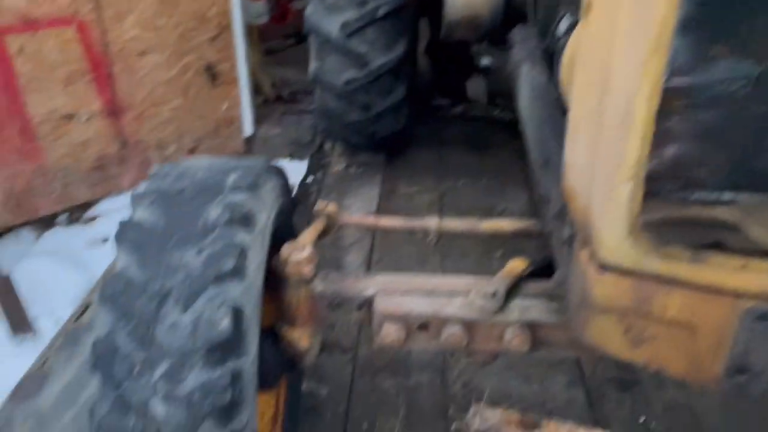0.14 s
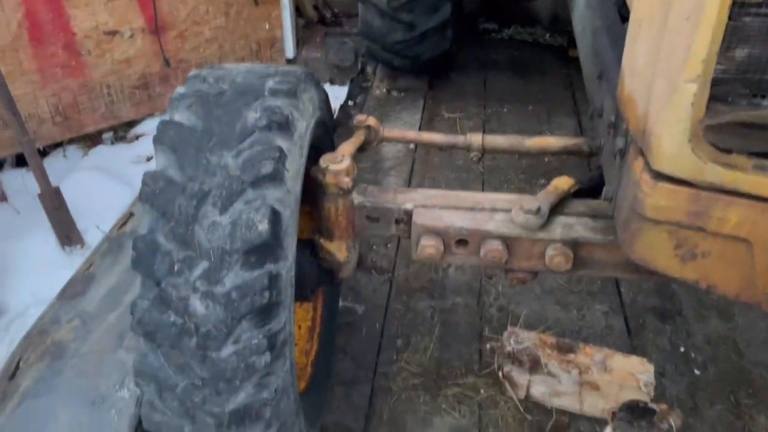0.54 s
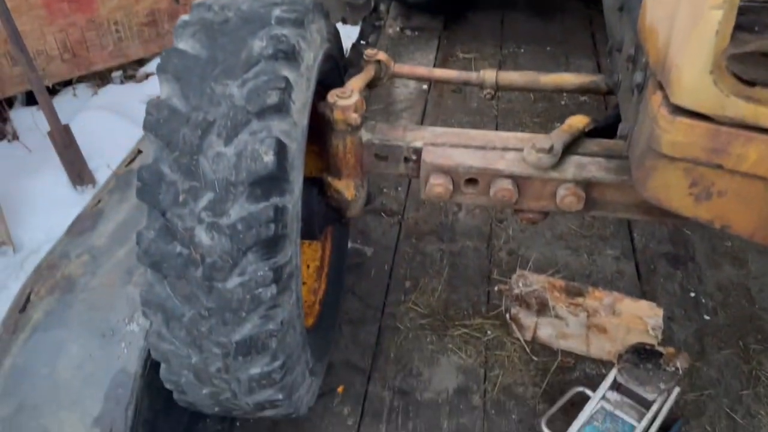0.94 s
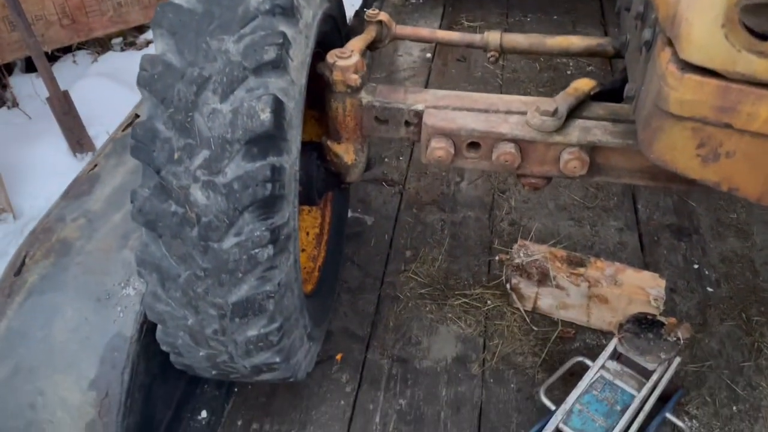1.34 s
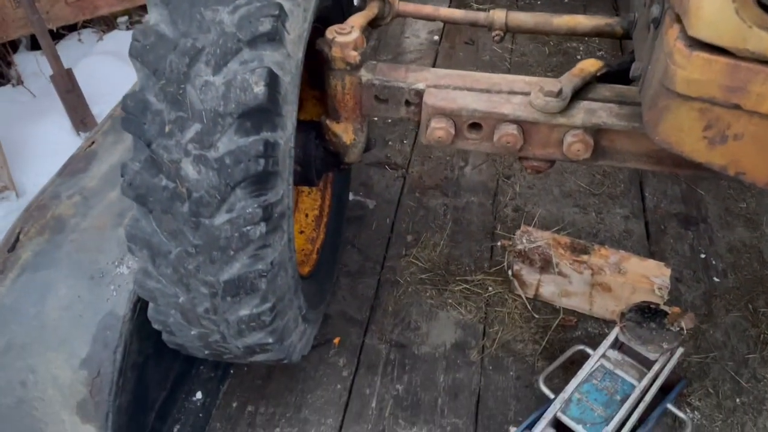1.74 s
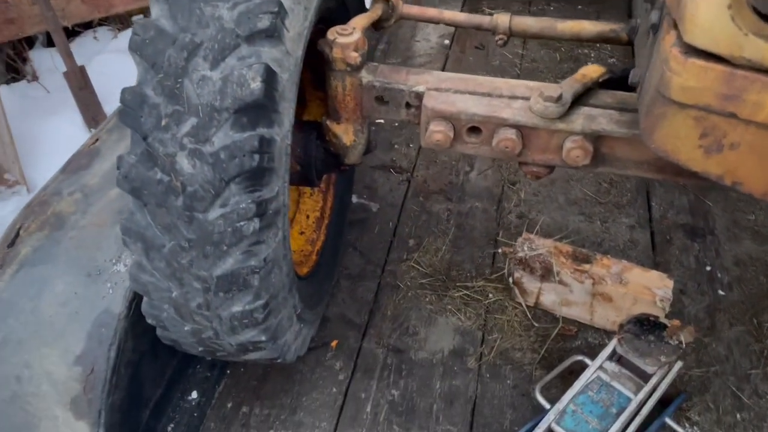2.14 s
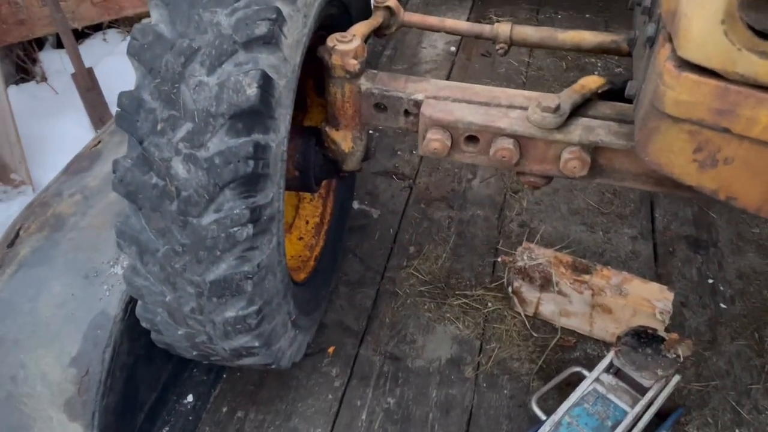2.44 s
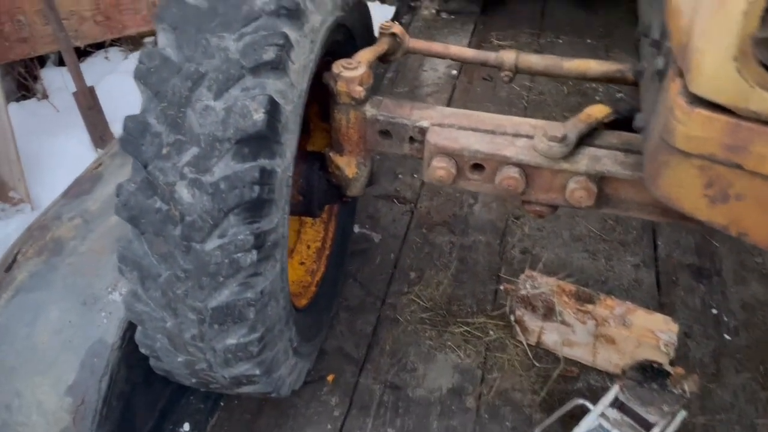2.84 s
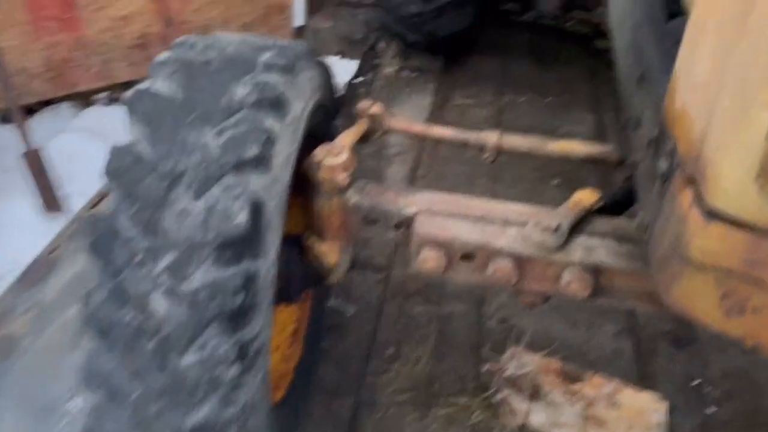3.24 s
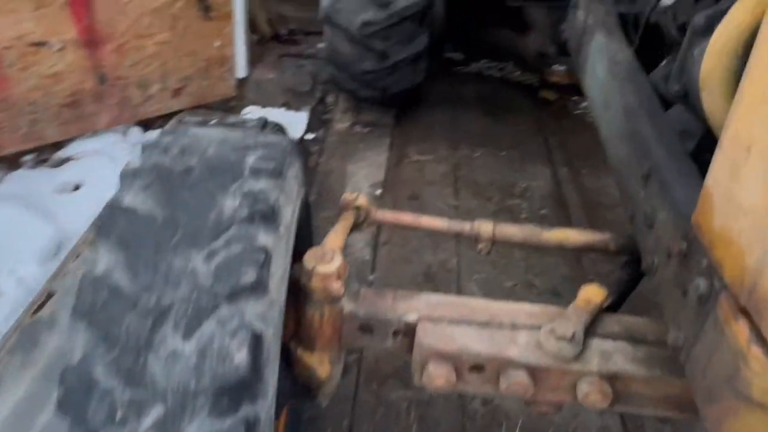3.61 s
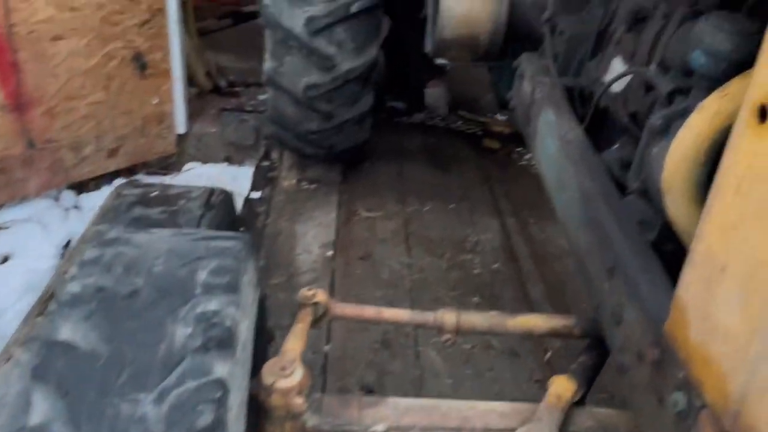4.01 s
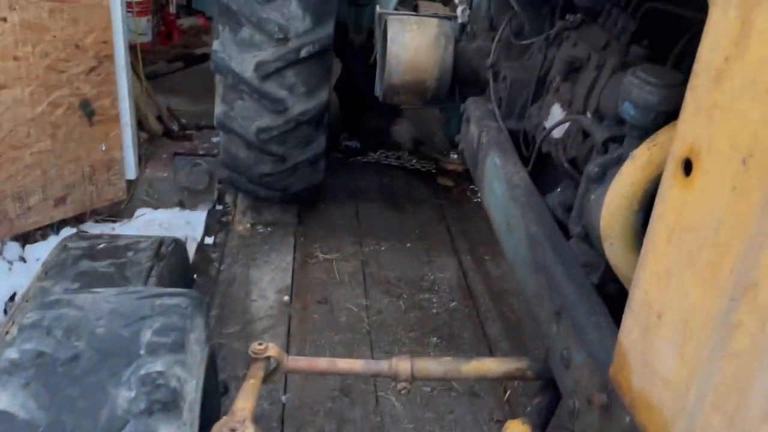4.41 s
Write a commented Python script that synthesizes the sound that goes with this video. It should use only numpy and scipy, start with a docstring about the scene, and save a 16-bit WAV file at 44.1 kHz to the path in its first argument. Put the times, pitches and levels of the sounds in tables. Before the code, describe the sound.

Wind thumps the microphone, then a steel pawl clicks in quick bursts, clanking on returns and ticking on pulls inside a farm building.

```python
"""A hand-held two-port microphone beside a loaded chain hoist and a silent tractor in a farm building.
Wind opens with heavy thumps, then stays as lighter rumble and buffets; faint still air lies underneath.
From 0.1 s the hoist is worked to and fro, a return first: the pawl clanks over three or four teeth on returns
and ticks brightly over five or six on pulls. Each drop is a burst of shaped noise plus ringing housing modes.
The chain clinks softly as the stroke turns, with one dull knock at 4.02 s, and jostles during pulls."""
import sys
import numpy as np
from scipy import signal
from scipy.fft import rfft, irfft, next_fast_len
from scipy.io import wavfile

SR = 44100
rng = np.random.default_rng(int(sys.argv[2]) if len(sys.argv) > 2 else 0)


def put_to_file(sound):
    """Save the sound as 16-bit audio at rate SR, in the file named by the first command-line argument."""
    columns = np.atleast_2d(sound).T  # one column per channel
    safe = np.clip(columns, -1, 1)
    whole_steps = np.round(safe * 32767)
    wavfile.write(sys.argv[1], SR, whole_steps.astype(np.int16))


N = 201316

# Wind on the microphone. Each row: time in [s], relative deep rumble in [dB], relative flutter in [dB].
WIND_LEVELS = [(0.0, -35.5, -18.5), (0.06, -15, -21), (0.1, -25, -23), (0.39, -29.5, -32), (0.41, -34, -32),
               (0.51, -22, -29), (0.63, -48.5, -65), (0.74, -28, -44), (1.05, -52.5, -55.5),
               (1.14, -31.5, -42.5), (1.18, -44, -52.5), (1.71, -55, -42.5), (1.78, -60, -66),
               (1.89, -34, -43.5), (2.03, -45.5, -39), (2.11, -34.5, -42.5), (2.17, -43, -53),
               (2.26, -33.5, -37), (2.41, -35.5, -42.5), (2.45, -30.5, -38.5), (2.54, -40.5, -48),
               (2.83, -37, -43), (4.28, -42.5, -44.5), (4.33, -36, -42), (4.52, -45, -55), (4.56, -23, -27)]
# Spectrum of the wind eddies. Each row: frequency in [Hz], relative density in [dB per Hz].
WIND_SPECTRUM = [(13, -38), (22, -49), (43, -6.5), (65, -1), (200, -7.5), (227, -8), (294, -7),
                 (371, -10.5), (411, -21), (480, -13), (620, -60), (1060, -120)]
# Thumps on the microphone, and at 4.02 s the dull knock of a seating link.
# Each row: start in [s], relative level in [dB], pitch in [Hz].
THUMPS = [(.011, -12.5, 326), (0.027, -12.5, 474), (0.04, -14, 604), (.047, -16.5, 61), (0.067, -14, 370),
          (0.094, -17, 363), (.177, -12.5, 360), (0.452, -15.5, 670), (.492, -19.5, 315), (.754, -25, 324),
          (2.096, -25.5, 293), (2.442, -24.5, 199), (2.487, -27.5, 285), (2.961, -25, 198),
          (3.815, -28.5, 170), (4.02, -30.5, 500), (4.325, -25.5, 91), (4.546, -23.5, 231)]
# Still air of the building. Each row: frequency in [Hz], relative density in [dB per Hz].
AIR_SPECTRUM = [(30, -4.5), (60, 2.5), (120, -15), (300, -22), (700, -22.5), (2000, -17.5), (5000, -23),
                (9000, -34), (15000, -41)]
# The two microphone ports. Each row: frequency in [Hz], left over right in [dB], likeness [0-1],
# phase by which left leads in [rad].
MIC_PORTS = [(400, 2, .7, 0), (1200, 1.5, .69, -.1), (1900, 3.2, .45, -.4), (2600, 6, .75, .6),
             (3400, 3.1, .44, -.6), (5100, 1.8, .47, .4), (6600, 2.3, .8, -1.2), (8200, 0, .98, -3.2),
             (10200, 0, .85, -5.2), (11500, 0, .98, -6.3), (13000, 0, .82, -7.6), (14800, 0, .98, -9.4)]
# Spectrum of the struck steel. Each row: frequency in [Hz], relative density in [dB per Hz].
STEEL_SPECTRUM = [(250, -14), (600, -9), (850, -13), (1050, -10.5), (1200, -12.5), (1650, -5), (2100, -3.5),
                  (2800, -4), (4300, -6.5), (5400, -1), (7200, 0.5), (8800, 2), (10600, -3), (12000, -4),
                  (15600, -6.5)]
# How the steel ring dies. Each row: frequency in [Hz], 60 dB decay in [s] before scaling for pawl or chain.
STEEL_DECAY = [(500, 0.089), (1200, 0.1), (2500, 0.12), (5500, 0.13), (11000, 0.066)]
# The heavy parts swell after the tick. Each row: frequency in [Hz], build-up in [s].
STEEL_BUILD_UP = [(500, 0.0092), (2300, 0.0034), (5000, 0.0022), (11000, 0.0008)]
# A harder drop of the pawl favours the middle modes. Each row: frequency in [Hz],
# extra level in [dB per dB of force], weighted anew for each kind of blow.
FORCE_COLOUR = [(1000, -0.87), (1600, 0), (2600, 0.2), (3800, 1.7), (5300, -0.56), (12000, -0.5)]
# Modes of the hoist housing. Each row: frequency in [Hz], relative level in [dB], 60 dB decay in [s].
HOUSING_MODES = [(1051, -16, 0.15), (1455, -11, 0.12), (1621, -9, 0.15), (2080, -10, 0.18),
                 (2455, -18.5, 0.3), (2550, -21, 0.23), (2844, -9.5, 0.13), (3370, -11, 0.076),
                 (3876, -14, 0.077), (5280, -15.5, 0.2), (7100, -1.5, 0.02), (9470, -11.5, 0.045),
                 (11360, -11, 0.11), (11800, -20.5, 0.1)]
# Returns of the handle. Each row: first click in [s], last click in [s], teeth [count],
# lag at mid-stroke [share of the stroke], relative ring in [dB], relative tick in [dB],
# growth of the ring over the stroke in [dB], centre of the strongest ring's pitch in [Hz].
RETURN_STROKES = [(0.1136, 0.3006, 4, -.128, -22.5, -30, -0.5, 2955),
                  (0.8707, 0.9926, 3, -0.009, -24, -29, -2, 1700),
                  (1.593, 1.6955, 3, -.025, -23, -28, 0.5, 2604),
                  (2.2948, 2.383, 3, 0.022, -21.5, -28.5, 2, 2163),
                  (3.0127, 3.101, 3, .003, -22.5, -27.5, 4, 2120),
                  (3.721, 3.8126, 3, -0.011, -20, -25, 4.5, 2884),
                  (4.426, 4.5228, 3, 0.058, -18, -25, 5.5, 2624)]
# Chain links seating as the stroke turns. Each row: time in [s], relative ring in [dB].
SEATING_LINKS = [(0.376, -24.5), (0.7658, -22.5), (0.808, -29.5), (1.1584, -22), (1.4918, -24.5),
                 (1.5235, -30), (1.8542, -22), (2.182, -34.5), (2.575, -20), (2.9185, -28.5), (2.95, -33),
                 (3.2466, -30.5), (3.275, -28.5), (3.3093, -16), (3.613, -28.5), (3.64, -27), (3.9618, -25),
                 (4.0173, -12), (4.3206, -30), (4.3594, -32.5)]
# Pulls of the handle. Each row: first click in [s], last click in [s], teeth [count],
# lag at mid-stroke [share of the stroke], slowing at both ends [share], relative ring in [dB].
PULL_STROKES = [(0.4483, 0.623, 6, -.008, 0.058, -26.5), (1.2272, 1.3693, 5, -0.042, 0.046, -26.5),
                (1.9203, 2.0613, 5, -0.018, 0.03, -26.5), (2.6337, 2.7788, 5, -0.016, 0.042, -27),
                (3.3593, 3.5015, 5, .012, 0.0102, -23), (4.0674, 4.2363, 5, -0.075, 0.052, -22.5)]

TIME = np.arange(N) / SR
SIZE = next_fast_len(N)
FREQS = np.maximum(np.fft.rfftfreq(SIZE, 1 / SR), 1)

AIR_DB = -50
CUTOFF_HZ = 15900
RETURN_SLOWING, RETURN_CRACK_OVER_TICK_DB = 0.066, 1
# Pawl levels here are relative: strikes() adds its own offsets.
PULL_TICK_DB, PULL_CRACK_OVER_RING_DB, PULL_RING_HZ = -25.5, 10, 2110
PULL_TICK_GROWTH = 0.24  # extra dB of tick per dB that a pull rings above the softest one
TOOTH_SPREAD_DB = 0.6  # no two teeth of a pull tick quite alike
CHATTER_S = 0.0039  # how long the pawl bounces
RING_SCATTER = 0.011  # spread of the strongest ring's pitch, as a share
LINK_TICK_DB, LINK_CHATTER_S = -16, 0.0055  # tick relative to the ring; how long a link rattles
# The chain runs a little longer than a pull's clicks, and softer than the pull by RUN_DB.
RUN_LEAD_S, RUN_TAIL_S, RUN_DB, RUN_SPREAD_DB = 0.037, 0.012, -15, 3.5


def from_db(db):
    """Decibels to gain."""
    return 10 ** (np.asarray(db) / 20)


def at_hz(points, hz, axis=1):
    """One column of a table, read on a log-frequency axis."""
    points = np.array(points)
    return np.interp(np.log(hz), np.log(points[:, 0]), points[:, axis])


def rms_one(x):
    """Scale to unit level."""
    return x / np.sqrt(np.mean(x ** 2) + 1e-20)


def butter(x, hz, kind, order=2):
    """Causal low- or high-pass."""
    return signal.sosfilt(signal.butter(order, hz, kind, fs=SR, output="sos"), x)


def to_wave(spectrum):
    """Stereo spectrum to a wave of the scene's length."""
    return irfft(spectrum, SIZE)[:, :N]


def port_noise(level_db):
    """Spectrum of a unit-level noise as the two ports hear it: partly alike, right leading in the high treble."""
    first, second = rfft(rng.standard_normal((2, SIZE)))
    tilt_db, alike, phase = (at_hz(MIC_PORTS, FREQS, axis=k) for k in range(1, 4))
    alike = np.clip(alike, 0, 1)
    right = alike * first + np.sqrt(1 - alike ** 2) * second
    right = right * np.exp(-1j * phase)
    gains = rms_one(from_db(level_db + np.array([tilt_db, -tilt_db]) / 2))
    return gains * np.array([first, right])


def place(seconds, weights):
    """Impulses of the given weights at the given times."""
    at = np.clip(seconds * SR, 0, N - 1).astype(int)
    return np.bincount(at.ravel(), weights.ravel(), N)


def ring(clicks, hz, t60):
    """A unit click sets a decaying sine of starting height 1 ringing."""
    radius = from_db(-60 / (t60 * SR))
    angle = 2 * np.pi * hz / SR
    return signal.lfilter([0, np.sin(angle)], [1, -2 * radius * np.cos(angle), radius ** 2], clicks + 1e-18)


def fade(power, t60):
    """Energy put in dies away by 60 dB in t60."""
    return signal.lfilter([1], [1, -from_db(-60 / (t60 * SR)) ** 2], power + 1e-18)


def swell(power, seconds):
    """Energy takes a moment to spread through the metal."""
    keep = np.exp(-1 / (seconds * SR))
    return signal.lfilter([1 - keep], [1, -keep], power)


def wind(rumble_db, flutter_db, rush_db, side_db, flutter_hz, rush_hz, rush_growth, lumps_db, lumps_hz):
    """Eddies rumble in lumps on both ports nearly alike; the middle range grows faster with the gusts."""
    s, deep, flutter = np.transpose(WIND_LEVELS)
    deep, flutter = np.interp(TIME, s, deep), np.interp(TIME, s, flutter)
    noise = rfft(rng.standard_normal((2, SIZE)))
    mid, side = to_wave(noise * from_db(at_hz(WIND_SPECTRUM, FREQS)))
    lumps = from_db(lumps_db * rms_one(butter(rng.standard_normal(N), lumps_hz, "low")))
    eddies = (mid + from_db(side_db) * side * [[1], [-1]]) * lumps
    low = rms_one(butter(eddies, 156, "low", order=4))
    high = butter(eddies, 176, "high", order=4)
    high = rms_one(butter(high, flutter_hz, "low", order=4))
    rush = to_wave(port_noise(np.zeros(len(FREQS)))) * lumps
    rush = butter(rush, 325, "high")
    rush = rms_one(butter(rush, rush_hz, "low", order=5))
    gust = flutter + rush_growth * (flutter - flutter.max())
    return low * from_db(deep + rumble_db) + high * from_db(flutter + flutter_db) + rush * from_db(gust + rush_db)


def still_air():
    """The building's air is a faint steady noise, shaped by its spectrum."""
    return from_db(AIR_DB) * to_wave(port_noise(at_hz(AIR_SPECTRUM, FREQS)))


def thumps(level_db, cycles):
    """Each thump, and the one link knock, is a dull swing that dies in a few cycles, alike on both ports."""
    out = np.zeros(N)
    for s, db, hz in THUMPS:
        out = out + ring(place(np.array([s]), from_db([db])), hz, cycles / hz)
    return from_db(level_db) * butter(out, 1670, "low", order=4)


def tooth_times(first, last, teeth, lag, slowing):
    """The teeth pass evenly but for the hand, slow at both ends of a stroke and early or late between."""
    way = np.linspace(0, 1, int(round(teeth)))
    return first + (last - first) * (way + lag * np.sin(np.pi * way) + slowing * np.sin(2 * np.pi * way))


def pawl_drops():
    """One drop per tooth: (s, crack dB, ring dB, tick dB, chatter s, strongest ring Hz), levels relative."""
    drops = []
    for first, last, teeth, lag, ring_db, tick_db, growth_db, hz in RETURN_STROKES:
        crack_db = tick_db + RETURN_CRACK_OVER_TICK_DB
        for s in tooth_times(first, last, teeth, lag, RETURN_SLOWING):
            grown_db = growth_db * ((s - first) / (last - first) - 0.5)
            drops.append((s, crack_db, ring_db + grown_db, tick_db, CHATTER_S, hz))
    softest_db = min(row[-1] for row in PULL_STROKES)
    for first, last, teeth, lag, slowing, ring_db in PULL_STROKES:
        crack_db = ring_db + PULL_CRACK_OVER_RING_DB
        stroke_tick_db = PULL_TICK_DB + PULL_TICK_GROWTH * (ring_db - softest_db)
        for s in tooth_times(first, last, teeth, lag, slowing):
            tick_db = stroke_tick_db + TOOTH_SPREAD_DB * rng.standard_normal()
            drops.append((s, crack_db, ring_db, tick_db, CHATTER_S, PULL_RING_HZ))
    return np.array(drops)


def steel_bands(ripple_db, count=26):
    """The close modes of hoist and chain, as noise with narrow ripples split in bands: [(Hz, stereo wave)]."""
    knots = np.arange(0, SR / 2, 90)
    ripple = np.interp(FREQS, knots, rng.standard_normal(len(knots)))
    ripple = ripple_db * ripple * at_hz([(1500, 0.18), (5000, 0.052)], FREQS)  # smoother in the treble
    modes = port_noise(at_hz(STEEL_SPECTRUM, FREQS) + ripple)
    centres = np.geomspace(350, 15000, count)
    position = np.interp(np.log(FREQS), np.log(centres), np.arange(count))
    position = position - np.maximum(np.log2(centres[0] / FREQS), 0)  # lowest band fades out over an octave
    bands = []
    for k, hz in enumerate(centres):
        share = np.cos(np.pi / 2 * np.clip(position - k, -1, 1))
        bands.append((hz, to_wave(modes * share)))
    return bands


def strikes(table, bands, ring_db, tick_db, favour, colour_db, ring_length, room_db, room_t60, count=6):
    """Each blow is a chatter of contacts: any crack, a short ring coloured anew each time, the room's tail."""
    s, peak, ring_level, tick_level, chatter = np.transpose(table)[:5]
    steps = np.arange(count) + rng.random((len(s), count))
    contacts = s[:, None] + chatter[:, None] * (steps - steps[:, :1]) / count
    shares = rng.exponential(1, (len(s), count)) * np.exp(-np.arange(count) / 5)  # later contacts tend softer
    shares /= shares.sum(axis=1, keepdims=True)
    colours = colour_db * rng.standard_normal((len(s), len(bands)))
    force_db = ring_level - ring_level.mean()
    out = np.zeros((2, N))
    for (hz, wave), colour in zip(bands, colours.T):
        treble = at_hz([(2900, 0.022), (5500, 1)], hz)  # share governed by the tick rather than the ring
        favoured = favour * at_hz(FORCE_COLOUR, hz) * force_db
        body_level = ring_level + ring_db + favoured
        level = (1 - treble) * body_level + treble * (tick_level + tick_db) + colour
        energy = swell(place(contacts, shares * from_db(level)[:, None] ** 2), at_hz(STEEL_BUILD_UP, hz))
        crack = treble * place(contacts, shares * from_db(peak + colour)[:, None] ** 2)
        power = fade(energy, ring_length * at_hz(STEEL_DECAY, hz)) + fade(crack, 0.015)
        scattered = swell(energy, 0.0057)  # the walls answer a little later, and keep the lows longer
        room = from_db(room_db) ** 2 * fade(scattered, room_t60 * (hz / 3000) ** -0.13)
        out += wave * np.sqrt(power + room)
    return out


def housing(drops, level_db, vary_db, strongest_db, strongest_t60, hardness, left_db):
    """Every pawl drop rings the housing's modes anew; one stands out, the more so the harder the drop."""
    s, _, ring_level, _, _, strongest = drops.T
    strongest = strongest * (1 + RING_SCATTER * rng.standard_normal(len(s)))
    strengths = vary_db * rng.standard_normal((len(s), len(HOUSING_MODES)))
    force_db = ring_level - ring_level.mean()
    out = np.zeros(N)
    for (hz, db, t60), extra in zip(HOUSING_MODES, strengths.T):
        height_db = ring_level + level_db + db + extra + at_hz(FORCE_COLOUR, hz) * force_db
        out = out + ring(place(s + 0.002, from_db(height_db)), hz, t60)  # 2 ms after the drop
    age = TIME[:SR // 4]
    envelope = from_db(-60 * age / strongest_t60) * (1 - np.exp(-age / 0.003))
    pings = np.sin(2 * np.pi * strongest[:, None] * age) * envelope
    heights = from_db(ring_level + strongest_db + hardness * force_db)
    at = (s[:, None] * SR).astype(int) + np.arange(len(age))
    out = out + np.bincount(at.ravel(), (heights[:, None] * pings).ravel(), N)[:N]
    return out * from_db(np.array([[left_db], [-left_db]]) / 2)


def running_links(count=6):
    """While a pull hauls the chain, links jostle at random: (s, relative ring dB)."""
    links = []
    for first, last, *_, pull_db in PULL_STROKES:
        for _ in range(count):
            s = rng.uniform(first - RUN_LEAD_S, last + RUN_TAIL_S)
            links.append((s, pull_db + RUN_DB + RUN_SPREAD_DB * rng.standard_normal()))
    return links


def chain(bands, lead_s, lead_db):
    """A link grazes its neighbour, then drops into its pocket without a crack; softer ones jostle during pulls."""
    grazes = [(s - lead_s, db + lead_db) for s, db in SEATING_LINKS]
    links = list(SEATING_LINKS) + grazes + running_links()
    blows = [(s, -np.inf, db, db + LINK_TICK_DB, LINK_CHATTER_S) for s, db in links]  # -inf: no crack
    return strikes(blows, bands, ring_db=4.0, tick_db=3.0, favour=-0.2, colour_db=1.5,
                   ring_length=0.6, room_db=-18, room_t60=0.25)


def scene():
    """Wind, still air, thumps, hoist and chain."""
    gusts = wind(rumble_db=-1.0, flutter_db=-2.0, rush_db=-3, side_db=-9.5, flutter_hz=480,
                 rush_hz=675, rush_growth=0.5, lumps_db=3.0, lumps_hz=28.3)
    dull_blows = thumps(level_db=6.5, cycles=5.9)
    bands = steel_bands(ripple_db=1.0)
    drops = pawl_drops()
    pawl = strikes(drops, bands, ring_db=5.5, tick_db=2.5, favour=0.47, colour_db=2.5,
                   ring_length=0.73, room_db=-15.5, room_t60=0.25)
    body = housing(drops, level_db=-9.5, vary_db=5.5, strongest_db=-3.0, strongest_t60=0.041,
                   hardness=1.0, left_db=5.0)
    links = chain(bands, lead_s=0.0091, lead_db=-9.5)
    return gusts + still_air() + dull_blows + pawl + body + links


def record(dry):
    """The deepest rumble and the top are cut."""
    lean = butter(dry, 36, "high", order=4)
    return signal.sosfilt(signal.ellip(10, 0.2, 80, CUTOFF_HZ, fs=SR, output="sos"), lean)


dry = scene()
out = record(dry)
put_to_file(out)
```